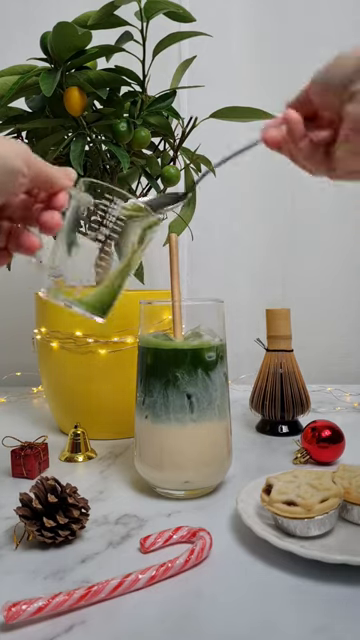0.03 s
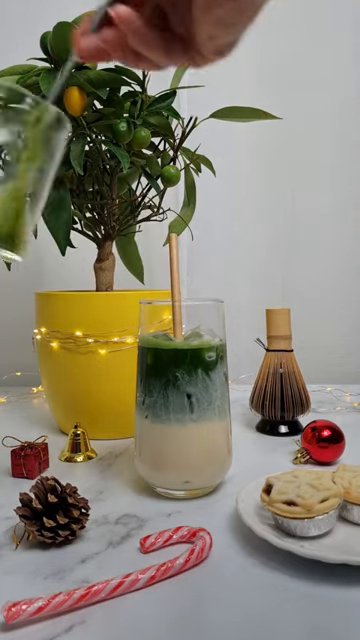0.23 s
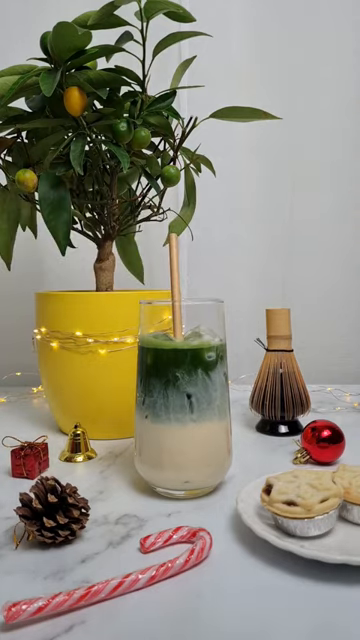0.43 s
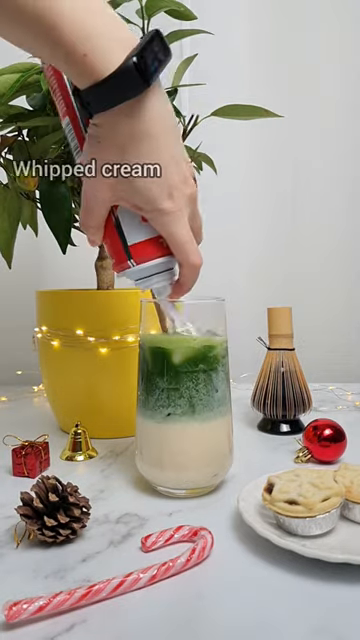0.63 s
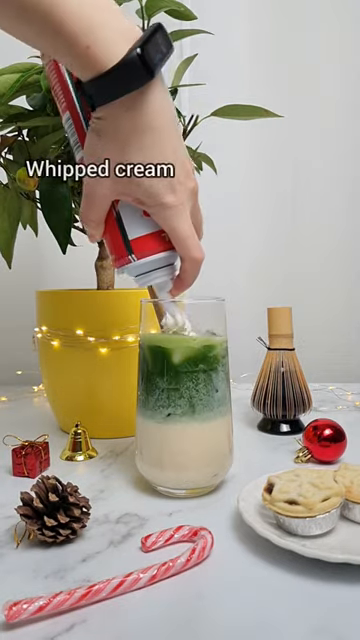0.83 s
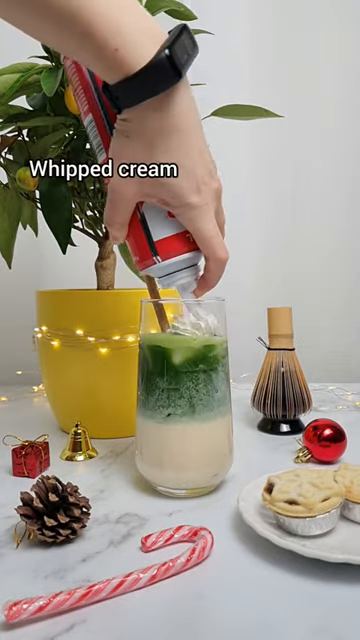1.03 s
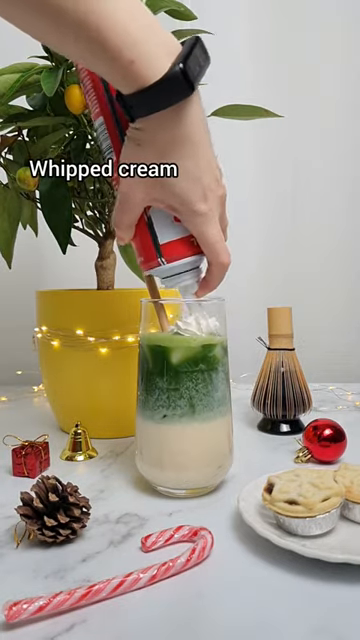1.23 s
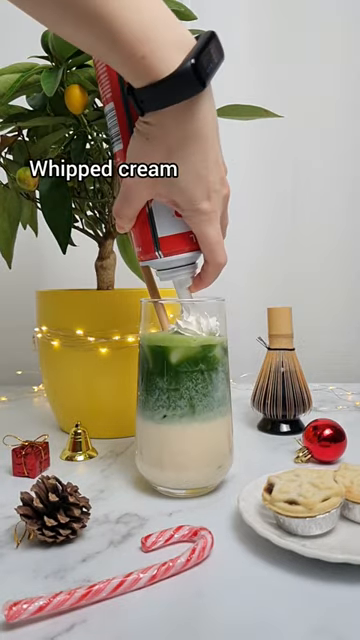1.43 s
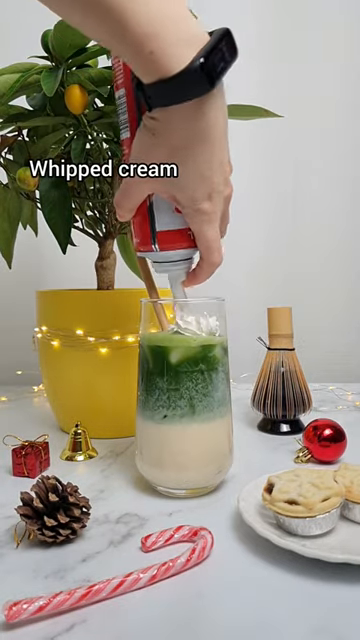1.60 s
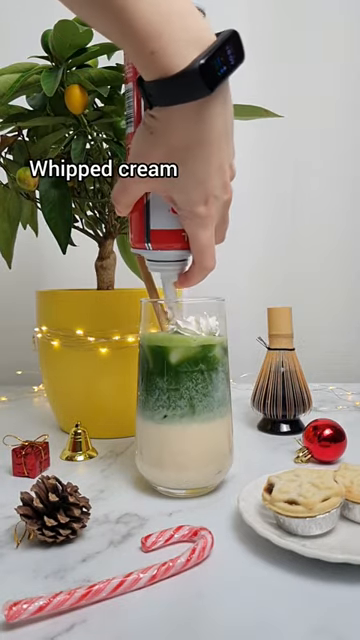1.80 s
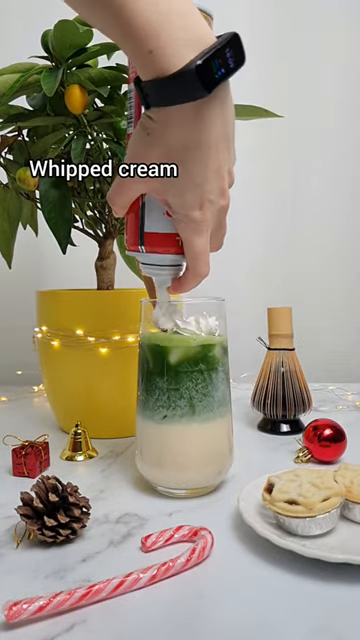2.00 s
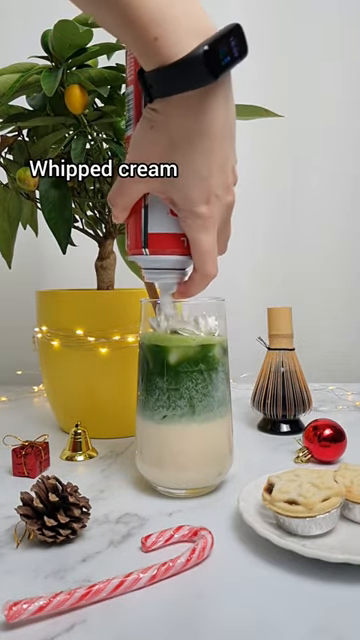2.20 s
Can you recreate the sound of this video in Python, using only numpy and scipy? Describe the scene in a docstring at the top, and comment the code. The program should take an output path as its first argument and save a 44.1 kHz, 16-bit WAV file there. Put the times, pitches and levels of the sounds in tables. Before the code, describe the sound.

Whipped cream hisses and sputters from an aerosol can after a spoon clinks on glass.

```python
"""An aerosol can pipes whipped cream into a glass: gas hisses, rasps and whistles in the nozzle, foam cells
burst in a sputter, gas pockets pop at the tip or ring low in the cream. The air in the glass rings along.
Before the spray, a metal spoon taps twice and clinks on a glass jug in a small room; a short clatter follows
and cuts off abruptly. The valve thumps low as it is pressed, just before the spray. Faint room rumble
throughout."""
import sys
import numpy as np
from scipy import signal
from scipy.fft import rfft, irfft
from scipy.io import wavfile

SR = 44100
rng = np.random.default_rng(int(sys.argv[2]) if len(sys.argv) > 2 else 0)


def log_audio(samples):
    """Write samples as a 16-bit WAV file to the path given in sys.argv[1]."""
    # one column per channel
    frames = np.atleast_2d(samples).T
    # limit to full scale, then quantise
    limited = np.clip(frames, -1, 1)
    pcm = np.round(limited * 32767).astype(np.int16)
    wavfile.write(sys.argv[1], SR, pcm)


N = 103635
TIME_S = np.arange(N) / SR
FFT_SIZE = 2 ** 17
FREQS_HZ = np.arange(FFT_SIZE // 2 + 1) * SR / FFT_SIZE
CUTOFF_HZ = 15500

# spray envelopes: (time [s], sputter [dB], whistle [dB], rasp [dB], hiss [dB])
SPRAY_LEVELS = [(0.66, -56.5, -60, -66, -59), (0.762, -59, -65, -56, -54.5), (0.824, -50, -53, -53, -52),
                (0.918, -50.5, -57.5, -50.5, -50), (1.03, -51.5, -49.5, -55, -49),
                (1.078, -53.5, -51.5, -55.5, -50.5), (1.266, -51.5, -49.5, -61.5, -52),
                (1.408, -55.5, -67, -62.5, -53.5), (1.46, -56.5, -67, -61.5, -53.5),
                (1.642, -57.5, -62.5, -65, -55.5), (1.752, -66.5, -70, -76, -62),
                (1.798, -60, -65, -70, -56.5), (1.89, -57.5, -66, -63, -56.5), (1.93, -60, -61, -66, -55.5),
                (2.076, -55.5, -56.5, -57.5, -53.5), (2.104, -55.5, -61, -60.5, -52.5),
                (2.278, -57.5, -59, -60.5, -54.5), (2.33, -58.5, -53, -55, -52)]
# nozzle whistle, wandering with the flow: (time [s], frequency [Hz])
WHISTLE_TRACK = [(.8, 2855), (.93, 2990), (1.0, 2857), (1.3, 2815), (1.4, 2950), (1.94, 2766), (2.07, 2810),
                 (2.2, 2795), (2.33, 2724)]
# gas pockets leaving the tip: (time [s], bass [dB], middle [dB], top [dB])
POP_EVENTS = [(.806, -45, -29, -39), (.82, -52, -47, -40), (.836, -41, -33, -37), (0.855, -42, -47, -31),
              (.876, -54, -38, -28), (0.906, -22.5, -34, -31), (.953, -25, -31, -27),
              (0.979, -36, -35, -27.5), (1.033, -28, -35, -25.5), (1.054, -27, -32, -30),
              (1.0891, -36, -29.5, -24.5), (1.130, -28, -31, -39), (1.152, -30, -27.5, -36),
              (1.203, -31, -28, -35), (1.215, -21.5, -28, -30), (1.229, -27, -37, -37),
              (1.345, -26.5, -41, -31), (1.358, -33, -45, -39), (1.557, -24, -31, -42),
              (1.604, -29.5, -35.5, -32.5), (1.6147, -31.5, -29.5, -46), (1.632, -32.5, -35, -31),
              (1.768, -32, -34.5, -38.5), (1.8683, -33, -30, -40), (1.912, -27.5, -33.5, -41),
              (1.964, -29, -37, -46), (1.9873, -27, -30, -37), (2.013, -33, -35, -35),
              (2.030, -26, -40, -55), (2.053, -25.5, -38, -43), (2.068, -22.5, -30, -39),
              (2.093, -39, -36, -54), (2.122, -29, -35, -34), (2.234, -36, -27.5, -32),
              (2.278, -46, -44, -42), (2.321, -56, -33, -45)]
# low rings: the valve's thump as it is pressed, then large gas pockets: (time [s], frequency [Hz], level [dB],
# t60 [s])
GULP_EVENTS = [(0.646, 114, -61, 0.046), (0.649, 234, -47.5, 0.026), (1.417, 192, -53, 0.14),
               (1.444, 244, -54.5, 0.19), (1.986, 326.6, -54, 0.077), (2.031, 247, -51, 0.095),
               (2.068, 259, -53.5, 0.18), (2.091, 352, -51, 0.093)]
# spray spectra: (frequency [Hz], left [dB], right [dB])
FOAM_SPECTRUM = [(40, -38, -60), (90, -21, -41), (183, -17.5, -23.5), (282, -9.5, -9), (610, -10.5, -5.5),
                 (740, -15, -8.5), (1080, -7, 0.5), (1550, -8.5, 0), (1770, -3.5, 1), (1960, -5.5, -1.5),
                 (2400, -13, -7)]
RASP_SPECTRUM = [(2060, 3.5, -5), (2240, -0.5, 1.5), (2850, 2, 3.5), (3610, 3, 4.5), (4020, -35, -25.5),
                 (4400, -12, -9), (5840, -12.5, -19), (8650, -34, -31.5)]
HISS_SPECTRUM = [(4380, -3, -4), (5900, -16, -13.5), (6970, -13, -8), (7900, -14, -17.5),
                 (10100, -11, -16.5), (11800, -8.5, -6), (12700, -6.5, -5.5), (13600, -18, -5),
                 (15300, -12.5, -2)]
POP_SPECTRUM = [(80, -31, -21), (183, -18.5, -15.5), (268, -5.5, -4.5), (636, -5, -1), (1110, -10.5, 5.5),
                (1650, 3.5, 10), (2300, -5, -5), (2750, -19, -18), (3500, -18, -18), (8000, -44, -32)]
# air modes of the drinking glass: (frequency [Hz], width [Hz], gain [dB])
GLASS_AIR_MODES = [(326, 19, 1.5), (486, 21, -11.5), (618, 22, -1.5), (1188, 18, -10.5), (1457, 21, -12),
                   (1485.5, 22, 5.5), (1705, 44, -5.5)]

# contacts on glass: (time [s], ring [dB], crack [dB])
TAP_HITS = [(0.1370, -30.5, -24.5), (0.1465, -28.5, -27), (0.1508, -26, -30), (0.1850, -41, -28)]
CLINK_HITS = [(0.3328, -23.5, -19.5), (0.3357, -22, -18.5), (0.3387, -30.5, -33), (0.3460, -31, -28),
              (0.3535, -24.5, -17)]
KNOCK_HITS = [(0.5968, -29, -21.5), (0.6070, -23, -25.5), (0.6155, -29, -24)]
# ringing modes: (frequency [Hz], level [dB], t60 [s], left minus right [dB])
TAP_RING = [(910, -7.5, 0.099, -15), (948, -17.5, 0.23, -15), (1610, -15.5, 0.25, -3),
            (1683, -10.5, 0.15, -1), (2670, -20, 0.36, -3), (2795, -8, 0.031, 7), (3460, -20.5, .18, 2),
            (4950, -17.5, 0.37, -5.5), (5760, -27, 0.14, 6), (7560, -11, 0.072, -15.5),
            (9090, -3, 0.09, -1), (12240, -7, 0.062, 5), (12100, 2.5, 0.062, -5), (13900, -5, 0.077, -7),
            (15030, -8, 0.085, -11)]
CLINK_RING = [(930, -27, 0.32, -8), (2270, -26, 0.13, 0), (2313, -13.5, 0.29, 16), (2397, -8, 0.22, -2.5),
              (2400, -32.5, 0.8, 3), (2670, -25, 0.42, 1), (3450, -31, 0.29, -6), (4120, -24.5, 0.26, 9),
              (4954, -23, 0.28, 2), (6805, -18, 0.2, -13), (7622, -21, 0.14, -6), (9400, -2, 0.079, 2),
              (11200, -10, 0.065, 2), (11520, -1, 0.11, -6), (12210, -10, 0.068, -8),
              (12350, -2.5, 0.16, -5), (12330, 4.5, 0.1, -9.5), (13900, -5, 0.17, -2),
              (14414, -14, .16, -1), (15194, -3.5, 0.087, -3)]
KNOCK_RING = [(950, -20, 0.07, -3), (2174, -10, 0.1, 0), (2280, -21, 0.19, 21), (2320, -10.5, 0.22, -3),
              (3360, -23, 0.19, -8), (4200, -12.5, 0.24, -7.5), (4740, -16, 0.2, 3), (8900, -2.5, 0.05, 8),
              (12100, -16.5, 0.055, 2), (13718, -14, .08, 0)]
# crack and tail spectra: (frequency [Hz], left [dB], right [dB])
TAP_SPECTRUM = [(199, -15.5, -20), (640, -8, -7.5), (936, -6, -2.5), (1240, -11.5, -13), (2100, -16.5, -13),
                (2860, -12.5, -5.5), (4270, -10.5, -12.5), (5470, -5.5, -12.5), (7150, -18, -7),
                (8500, -4.5, -16), (9600, -14, -11), (11700, -3.5, -3), (12900, -16, -25), (14000, -17, -7),
                (15300, -9, -14)]
CLINK_SPECTRUM = [(198, -29, -24.5), (594, -27.5, -18.5), (850, -7.5, -13), (1390, -23.5, -14.5),
                  (1990, -19, -12.5), (2350, -11.5, 2.5), (2650, -19, -18), (3340, -26.5, -30),
                  (4180, -8, -6.5), (4460, -21.5, -24), (5100, -10.5, -6), (6060, -20, -18),
                  (7140, -15, -10), (10000, -14, -16), (11360, -12, -10.5), (12500, -13, -10),
                  (13200, -22, -12.5), (14200, -22, -26), (15300, -8.5, -7.5)]
KNOCK_SPECTRUM = [(200, -19.5, -27), (670, -21, -14.5), (890, -4, -6), (1130, -24, -28), (2240, 5.5, -8.5),
                  (3340, -4, -2), (3930, -9.5, -20), (4600, 7, -8), (5100, -8.5, -5), (7140, -3.5, 1),
                  (9030, 2, -25), (9730, -14, -13), (12100, 5, 5.5), (13300, -7, -6), (14500, -6, 1),
                  (15500, -13, -8)]
# spoon sliding on the rim: (time [s], level [dB])
SLIDE_LEVELS = [(0.20, -73), (0.25, -58), (0.30, -54.5), (0.335, -50), (0.36, -84)]

# nozzle sound, left ahead of right: (frequency [Hz], phase [rad])
LEFT_LEAD = [(100, 0), (700, -.3), (1000, 1.7), (1400, 2.1), (3500, 2.2), (5000, 0)]
# nozzle sound, part common to both channels: (frequency [Hz], power share [0..1])
DIRECT_SHARE = [(60, 1), (300, 0.86), (600, 0.98), (900, 0.29), (1600, 0.8), (2200, 0.29), (2900, 0.79),
                (4000, 0.16), (7000, 0.072), (15000, .2)]
# room rumble: (frequency [Hz], left [dB], right [dB])
ROOM_SPECTRUM = [(20.1, -15, -23), (39, -21, -11), (59.3, 4, 6), (88, -15, -7.5), (257, -10, -8),
                 (500, -23, -18.5), (1000, -37, -31), (15000, -35, -37)]


def spray(foam_start_s=0.644, gas_start_s=0.654, open_s=0.0068, crossover_hz=1950):
    """Foam and gas leave the nozzle; each layer's level wavers."""
    sputter_db, whistle_db, rasp_db, hiss_db = in_time(SPRAY_LEVELS)
    sputter = foam_sputter(crossover_hz) * from_db(4 + sputter_db + drift(30))
    rasp = nozzle_rasp(crossover_hz) * from_db(4.5 + rasp_db + 0.79 * drift(40))
    balance_db = np.array([[-1.2], [1.2]])
    whistle = nozzle_whistle() * from_db(4 + whistle_db + 1.15 * drift(15) + balance_db)
    hiss = gas_hiss() * from_db(7 + hiss_db + 0.7 * drift(40))
    return (sputter + rasp + whistle) * ramp(foam_start_s, open_s) + hiss * ramp(gas_start_s, open_s)


def foam_sputter(below_hz):
    """Bursting foam cells excite the air in the glass."""
    direct = grains(per_s=600, spread_db=2)
    diffuse = np.array([grains(per_s=2500, spread_db=2.5) for _ in range(2)])
    bursts = glass_air(stereo(direct, diffuse))
    return unit_rms(cut(colour(bursts, FOAM_SPECTRUM), below_hz, "low"))


def nozzle_rasp(above_hz):
    """Foam in the nozzle: dense clicks plus diffuse noise."""
    crackle = stereo(grains(per_s=11000, spread_db=3), rng.standard_normal((2, N)))
    return unit_rms(cut(colour(crackle, RASP_SPECTRUM), above_hz, "high"))


def nozzle_whistle(width_hz=330):
    """Narrow band of turbulence around a wandering pitch."""
    carrier = np.exp(2j * np.pi * np.cumsum(in_time(WHISTLE_TRACK)[0]) / SR)
    noise = rng.standard_normal((3, N)) + 1j * rng.standard_normal((3, N))
    turbulence = cut(noise, width_hz / 2, "low", order=2)
    tone = (turbulence * carrier).real
    return unit_rms(stereo(tone[0], tone[1:]))


def gas_hiss(above_hz=4530):
    """Escaping gas: treble fizz, independent per channel."""
    fizz = np.array([grains(per_s=14000, spread_db=3.5) for _ in range(2)])
    return unit_rms(cut(colour(fizz, HISS_SPECTRUM), above_hz, "high"))


def pops(gain_db=10.5, lower_hz=600, upper_hz=1400, room_db=-6, room_t60_s=0.11):
    """One dull pulse per gas pocket; glass and room ring briefly."""
    impulses = np.zeros((3, N))
    for start_s, *levels_db in POP_EVENTS:
        impulses[:, int(start_s * SR)] += from_db(gain_db + np.array(levels_db))
    bass, middle, top = impulses
    body = cut(bass, lower_hz, "low", order=3) - cut(middle, lower_hz, "high", order=3)
    pulses = cut(body, upper_hz, "low", order=3) + cut(top, upper_hz, "high", order=3)
    room_response = rng.standard_normal((3, N)) * decay(0, room_t60_s)
    room_response /= np.sqrt(np.sum(room_response[0] ** 2))
    echo = signal.fftconvolve(pulses[None], room_response, axes=1)[:, :N]
    in_room = stereo(pulses) + from_db(room_db) * stereo(echo[0], echo[1:])
    return colour(glass_air(in_room), POP_SPECTRUM)


def gulps():
    """The valve thumps low as it is pressed; later, large gas pockets ring low in the cream."""
    return sum(from_db(db) * decay(start_s, t60_s) * np.sin(2 * np.pi * hz * (TIME_S - start_s))
               for start_s, hz, db, t60_s in GULP_EVENTS)


def glass_air(x):
    """Input plus the air resonances of the glass."""
    return x + sum(from_db(db) * resonance(x, hz, width_hz) for hz, width_hz, db in GLASS_AIR_MODES)


def spoon_on_jug():
    """Taps, a slide along the rim, a bright bouncing clink."""
    taps = strike(TAP_HITS, TAP_RING, TAP_SPECTRUM,
                  ring_db=-0.5, crack_t60_s=0.0099, tail_db=-9, tail_t60_s=0.29)
    clink = strike(CLINK_HITS, CLINK_RING, CLINK_SPECTRUM,
                   ring_db=-0.5, crack_t60_s=0.015, tail_db=-5, tail_t60_s=0.29)
    gate = (TIME_S > TAP_HITS[0][0]) * (TIME_S < KNOCK_HITS[0][0])
    friction = colour(rng.standard_normal((2, N)), TAP_SPECTRUM)
    slide = from_db(in_time(SLIDE_LEVELS)[0]) * gate * friction
    return taps + clink + cut(slide, 200, "high")


def clatter(stop_s=0.6205, drop_db=14, drop_s=0.0026, fade_db_per_s=525):
    """Three quick knocks of glass; the sound cuts off abruptly."""
    knocks = strike(KNOCK_HITS, KNOCK_RING, KNOCK_SPECTRUM,
                    ring_db=0.5, crack_t60_s=0.074, tail_db=-7.5, tail_t60_s=0.07)
    cutoff_db = drop_db * ramp(stop_s, drop_s) + fade_db_per_s * np.maximum(TIME_S - stop_s, 0)
    return knocks * from_db(-cutoff_db)


def strike(hits, modes, spectrum, ring_db, crack_t60_s, tail_db, tail_t60_s, overtone_share=0.75):
    """Blow on glass: a crack per contact, ringing modes, a tail of overtones and room noise."""
    times_s, ring_levels_db, crack_levels_db = np.transpose(hits)
    ring = cut(glass_ring(times_s, ring_levels_db, modes), 620, "high", order=2)
    noise = rng.standard_normal((2, N))
    low, high = cut(noise[0], 470, "low"), cut(noise, 640, "high")
    crack = (low + high) * hit_envelope(times_s, crack_levels_db, crack_t60_s)
    tail = low + np.sqrt(1 - overtone_share) * high + np.sqrt(overtone_share) * overtones()
    tail *= from_db(tail_db) * hit_envelope(times_s, ring_levels_db, tail_t60_s)
    return cut(colour(crack + tail, spectrum), 280, "high", order=2) + from_db(ring_db) * ring


def glass_ring(times_s, levels_db, modes, flutter_db=2.5, flutter_rad=0.55):
    """Decaying modes; the room makes each flutter in level and phase."""
    ring = 0
    for hz, db, t60_s, pan_db in modes:
        phase_rad = rng.uniform(0, 2 * np.pi) + np.array([[0], [rng.choice([-1, 1]) * np.pi / 2]])
        flutter_hz = 24 * (hz / 1000) ** 0.4
        waver_db = flutter_db * np.array([drift(flutter_hz), drift(flutter_hz)])
        phase_rad = phase_rad + flutter_rad * drift(flutter_hz)
        gain = from_db(db + waver_db + pan_db * np.array([[0.5], [-0.5]]))
        tone = np.sin(2 * np.pi * hz * TIME_S + phase_rad)
        ring += gain * hit_envelope(times_s, levels_db, t60_s) * tone
    return ring


def overtones(count=120, lowest_hz=700):
    """Partials crowding toward the treble; random strength and phase per channel."""
    draws = rng.standard_normal((count, 4))
    position = (np.arange(count) + rng.random(count)) / count
    hz = lowest_hz + position ** 0.75 * (CUTOFF_HZ - lowest_hz)
    lines = np.zeros((2, len(FREQS_HZ)), complex)
    lines[:, np.searchsorted(FREQS_HZ, hz)] = (draws[:, :2] + 1j * draws[:, 2:]).T / hz ** 0.2
    return unit_rms(irfft(lines)[:, :N])


def room_tone(gain_db=-77):
    """Faint rumble, nearly alike in both channels."""
    noise = rng.standard_normal(N) + rng.standard_normal((2, N)) / np.pi
    return from_db(gain_db) * colour(noise, ROOM_SPECTRUM)


def stereo(x, diffuse=None):
    """Nozzle sound arrives out of step left and right, mixed with any diffuse part."""
    spectrum = rfft(x, FFT_SIZE) * np.exp(1j * in_hz(LEFT_LEAD) * [[1], [0]])
    if diffuse is not None:
        share = in_hz(DIRECT_SHARE)
        spectrum = np.sqrt(share) * spectrum + np.sqrt(1 - share) * rfft(diffuse, FFT_SIZE)
    return irfft(spectrum)[:, :N]


def grains(per_s, spread_db):
    """Tiny cells bursting: random clicks of uneven size."""
    sizes = from_db(spread_db * np.minimum(rng.exponential(1, N), 4))
    signs = rng.choice([-1, 1], N)
    return unit_rms(sizes * signs * (rng.random(N) < per_s / SR))


def drift(corner_hz):
    """Slow random curve, unit spread."""
    hop, warmup = 40, 2000
    pole = np.exp(-2 * np.pi * corner_hz * hop / SR)
    noise = rng.standard_normal(N // hop + warmup + 2)
    slow = signal.lfilter([1], [1, -2 * pole, pole ** 2], noise)[warmup:]
    return np.interp(np.arange(N) / hop, np.arange(len(slow)), unit_rms(slow))


def colour(x, rows):
    """Left and right spectra, common minimum phase; white noise keeps its level."""
    gain = unit_rms(from_db(in_hz(rows)))
    cepstrum = irfft(np.log(gain).mean(axis=0))
    phase_rad = 2 * rfft(cepstrum[:FFT_SIZE // 2], FFT_SIZE).imag
    return irfft(rfft(x, FFT_SIZE) * gain * np.exp(1j * phase_rad))[:, :N]


def resonance(x, hz, width_hz):
    """Band-pass, unit gain at centre."""
    radius = np.exp(-np.pi * width_hz / SR)
    feedback = [1, -2 * radius * np.cos(2 * np.pi * hz / SR), radius ** 2]
    return signal.lfilter(np.array([1, 0, -1]) * (1 - radius ** 2) / 2, feedback, x)


def cut(x, hz, kind, order=4):
    """High- or low-pass."""
    return signal.sosfilt(signal.butter(order, hz, kind, fs=SR, output="sos"), x)


def hit_envelope(times_s, levels_db, t60_s):
    """Power sum of one decay per contact."""
    return np.sqrt(sum((from_db(db) * decay(s, t60_s)) ** 2 for s, db in zip(times_s, levels_db)))


def decay(start_s, t60_s):
    """Jump to 1, then exponential fall."""
    return (TIME_S >= start_s) * from_db(-60 * np.maximum(TIME_S - start_s, 0) / t60_s)


def ramp(start_s, rise_s):
    """Linear rise, 0 to 1."""
    return np.clip((TIME_S - start_s) / rise_s, 0, 1)


def in_time(rows):
    """Table columns per sample."""
    times_s, *columns = np.transpose(rows)
    return [np.interp(TIME_S, times_s, column) for column in columns]


def in_hz(rows):
    """Table columns per FFT bin."""
    hz, *columns = np.transpose(rows)
    return np.array([np.interp(np.log(FREQS_HZ + 1), np.log(hz), column) for column in columns])


def from_db(db):
    return 10 ** (np.asarray(db) / 20)


def unit_rms(x):
    return x / np.sqrt(np.mean(x ** 2) + 1e-20)


def scene():
    """Sum of all sources."""
    return spoon_on_jug() + clatter() + spray() + pops() + gulps() + room_tone()


def record(dry):
    """Steep low-pass."""
    return signal.sosfilt(signal.ellip(12, 0.2, 80, CUTOFF_HZ, fs=SR, output="sos"), dry)


dry = scene()
out = record(dry)
log_audio(out)
```